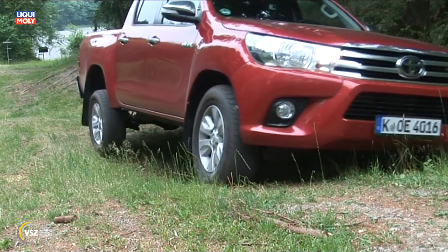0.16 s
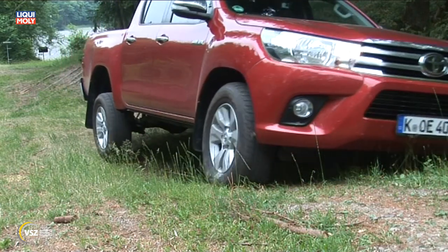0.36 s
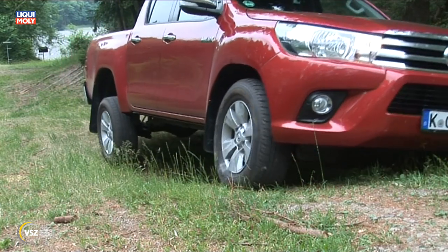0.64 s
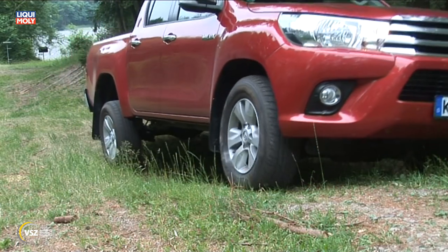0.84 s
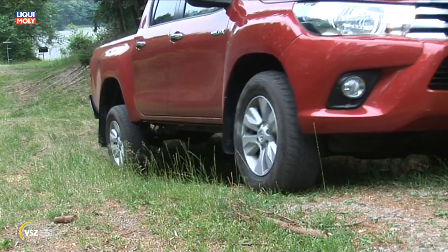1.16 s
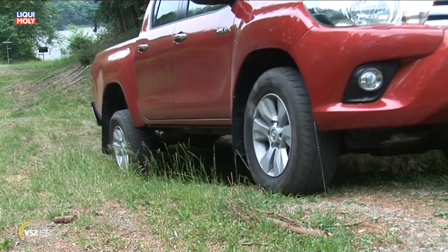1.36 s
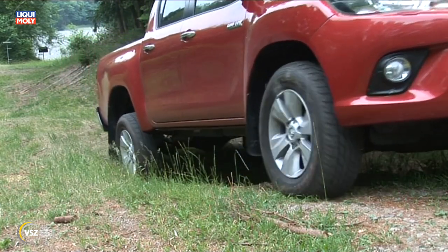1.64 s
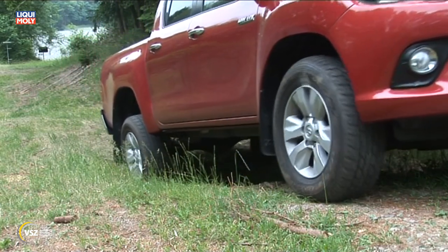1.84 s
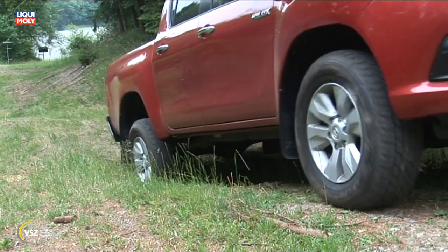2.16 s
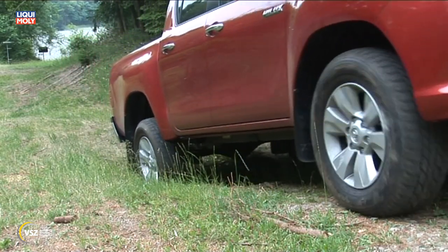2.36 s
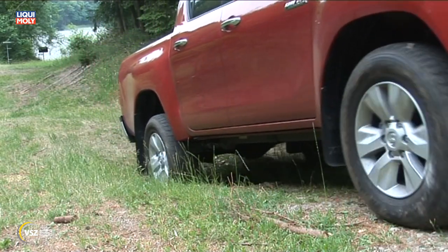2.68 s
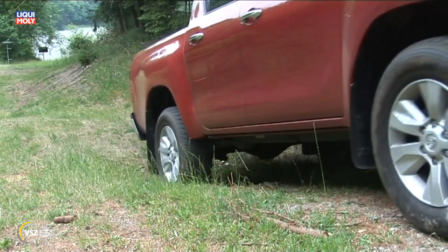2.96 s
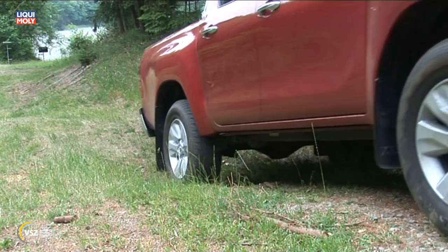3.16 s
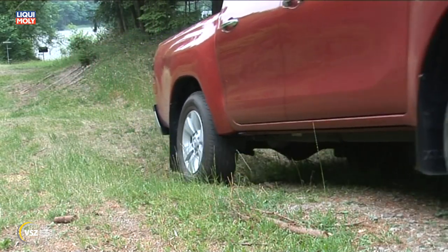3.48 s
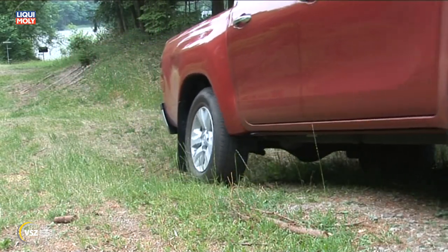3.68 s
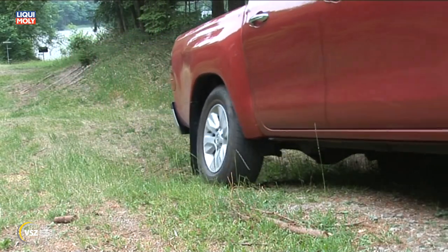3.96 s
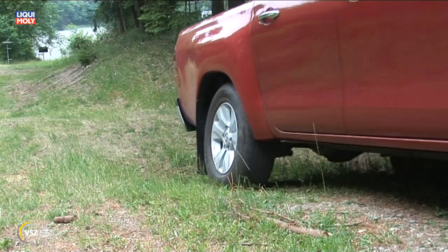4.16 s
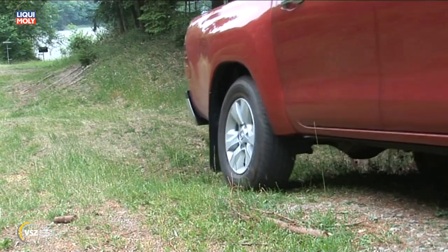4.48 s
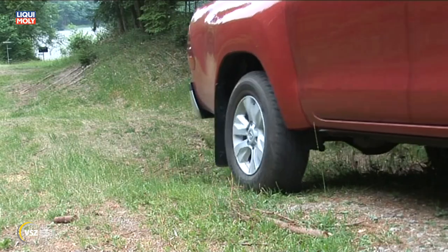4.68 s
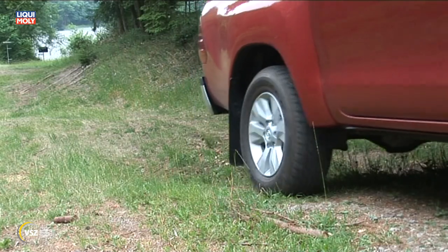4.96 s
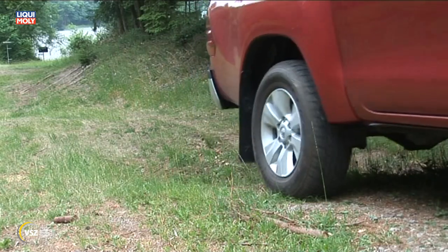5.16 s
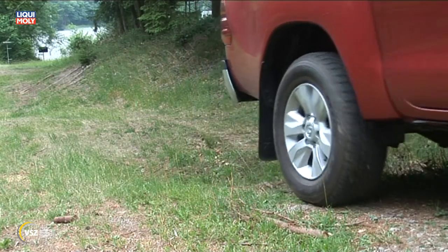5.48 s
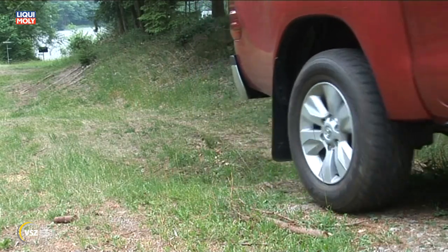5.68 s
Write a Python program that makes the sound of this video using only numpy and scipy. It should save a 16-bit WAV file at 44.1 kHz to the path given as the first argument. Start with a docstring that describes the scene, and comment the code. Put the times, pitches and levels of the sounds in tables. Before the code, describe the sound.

Outdoors, a diesel engine ticks and knocks at low, nearly steady revs as a pickup crawls toward a nearby microphone. A faint fan hum and the rumble of tyres on soft ground lie beneath, with two small dry cracks near the start. The sound swells and shifts to the right, a few harder clacks stand out, and the bright clatter gives way to hollow pulsing and hiss from under the passing body.

```python
"""A four-cylinder diesel pickup crawls over grass, just above idle, and slides close past the microphone.
Each firing pushes out a low pulse and sets off a volley of impacts: combustion knock, piston slap,
valves, injectors. Twice the engine sags under load and knocks harder; now and then one firing clacks.
As the grille goes by, the clatter gives way to boom and hiss from under the body, where the firings
ring a hollow. Behind it all the fan hums, the tyres rumble and two dry stalks snap."""
import sys
import numpy as np
from scipy import signal
from scipy.fft import rfft, irfft
from scipy.io import wavfile
from scipy.ndimage import uniform_filter1d

SR = 44100
rng = np.random.default_rng(int(sys.argv[2]) if len(sys.argv) > 2 else 0)


def dump_mix(stems):
    """Bounce the given channels to the path in sys.argv[1] as a 16-bit WAV at rate SR."""
    frames = np.atleast_2d(stems).T  # one column per channel
    limited = np.clip(frames, -1, 1)  # hard clip at full scale
    pcm = np.round(limited * 32767).astype(np.int16)
    wavfile.write(sys.argv[1], SR, pcm)


N = 257103
TIME, HZ = np.arange(N) / SR, np.fft.rfftfreq(N, 1 / SR)
CRAWL_M_PER_S = .8
HUM_SHADOW_DB = -6  # what the cab takes from the exhaust and the upper firing orders

# engine speed: (time [s], firing rate [Hz])
FIRING_RATE = [(0, 33.84), (.35, 34.64), (.62, 34.55), (.88, 32.05), (1.08, 31.95), (1.3, 34.2),
               (1.7, 33.7), (2.3, 33.69), (2.65, 33.37), (3.1, 33.67), (3.9, 33.7), (4.4, 33.58),
               (4.9, 32.67), (5.15, 33.96), (5.5, 33.77), (5.83, 34.67)]
# combustion impacts in one firing: (delay [firings], strength [dB], ring time [s])
COMBUSTION = [(-.11, 0, .006), (.1, -.5, .0055), (.3, -9, .005)]
# tone of the block and of the top end, each from ahead, then from the flank: (frequency [Hz], level [dB])
KNOCK_COLOURS = [(440, -35), (750, -8), (830, -7.5), (925, -5), (1000, -1), (1040, -2), (1140, -2.5),
                 (1250, -2.5), (1380, -8.5), (1480, -11.5), (1590, -3.5), (1900, -11.5), (2470, -77),
                 (4180, -120)], [(440, -9), (750, -0.5), (843, -5.5), (915, 0), (1010, -2.5), (1110, 1.5),
                 (1280, 0), (1550, 1), (1900, -4), (2470, -7), (4180, -120)]
CLATTER_COLOURS = [(1120, -56), (1900, -8.5), (2000, -10), (2230, -5.5), (2470, -4), (2960, -7.5),
                   (3280, -9.5), (3900, -16), (4480, -23.5), (5000, -19.5), (5350, -26), (5750, -14),
                   (6200, -31.5), (7000, -42), (9100, -50), (15400, -120)], [(1120, -53), (1900, -9),
                   (2470, -3.5), (2980, -6.5), (3520, -17), (4200, -23), (5460, -22), (9240, -120)]
# stereo image from ahead, then from the flank: (frequency [Hz], left-right likeness [0-1], left lead [rad])
IMAGES = [(60, 1.0, -0.1), (200, 0.99, -0.2), (350, 0.98, -0.3), (520, 0.93, -0.4), (800, 0.89, -0.2),
          (1200, 0.9, -0.2), (1700, 0.87, 0.3), (2400, 0.99, 0.0), (3100, 0.99, -0.0), (4400, 0.55, -1.3),
          (5000, 0.8, -0.3), (5400, 0.6, -2.4), (5800, 0.88, -3.2), (8500, 0.77, -3.3), (10500, 0.56, -5.9),
          (12500, 0.43, -6.0), (15000, 0.28, -5.7)], [(60, 1.0, -0.1), (200, 0.98, -0.3), (350, 0.96, -0.8),
          (520, 0.95, -1.4), (800, 0.83, -1.5), (1200, 0.71, -1.5), (1700, 0.62, 0.9), (2400, 0.81, -0.0),
          (3100, 0.83, -0.2), (4200, 0.63, -2.0), (5000, 0.65, -2.5), (5800, 0.79, -3.1),
          (8500, 0.59, -3.5), (10500, 0.67, -6.1), (12500, 0.52, -6.5), (15000, 0.35, -6.9)]


def gain_of(db):
    return 10 ** (np.asarray(db) / 20)


def curves(rows):
    """The columns of a time table, sample by sample."""
    times, *columns = np.transpose(rows)
    return [np.interp(TIME, times, column) for column in columns]


def spectra(rows):
    """The columns of a frequency table, bin by bin."""
    hz, *columns = np.transpose(rows)
    return [np.interp(np.log(HZ + 1), np.log(hz + 1), column) for column in columns]


def wander(per_s):
    """A smooth random drift of about unit size."""
    knots = np.arange(0, TIME[-1] + 1, 1 / per_s)
    return np.interp(TIME, knots, rng.standard_normal(1024)[:len(knots)])


def lift(hz, resonances):
    """Decibels that a set of resonances adds at these frequencies."""
    return sum(db / (1 + (2 * (hz - centre) / width) ** 2) for centre, width, db in resonances)


def passing(closest_m, distance_m):
    """Level in dB, 0 at its peak, of a source that passes distance_m away after closest_m of travel."""
    return -10 * np.log10(1 + ((closest_m - CRAWL_M_PER_S * TIME) / distance_m) ** 2)


def flank_share(after_m=2.46, over_m=.56):
    """0 with the grille ahead, 1 with the flank alongside."""
    return 1 / (1 + np.exp((after_m - CRAWL_M_PER_S * TIME) / over_m))


def shadow(after_m=4.1, over_m=.09):
    """0 with the engine in sight, 1 with the cab in between."""
    return 1 / (1 + np.exp((after_m - CRAWL_M_PER_S * TIME) / over_m))


def load(free_hz=34.6, full_droop_hz=2.6, smooth_s=.14):
    """Engine load, 0 free to 1 full, from how far the governor lets the firing rate droop."""
    droop = (free_hz - curves(FIRING_RATE)[0]) / full_droop_hz
    return np.clip(uniform_filter1d(droop, int(smooth_s * SR)), 0, 1)


def loudness(closest_m, distance_m, db, load_db):
    """Level in dB of one engine sound, set by distance and load."""
    return db + passing(closest_m, distance_m) + load_db * load()


def at_mics(pair, colour, image):
    """Colours two unrelated signals and blends them into a partly alike stereo pair at unit level."""
    # narrow resonances of block and covers: (frequency [Hz], width [Hz], lift [dB])
    resonances = [(1080, 130, 1.5), (2510, 110, 1.3), (2780, 220, 3.3), (3020, 160, 2.2), (4960, 480, 3.5)]
    left, other = rfft(pair) * gain_of(spectra(colour)[0] + lift(HZ, resonances))
    likeness, lead = spectra(image)
    right = likeness * left + np.sqrt(1 - likeness ** 2) * other
    heard = irfft(np.array([left * np.exp(.5j * lead), right * np.exp(-.5j * lead)]), N)
    return heard / heard.std()


def ring_on(pair, ring_s, ring_db):
    """Castings, covers and the cavity under the truck ring on in many narrow modes."""
    t = np.arange(SR // 6) / SR
    tail = rng.standard_normal(len(t)) * np.exp(-t / ring_s)
    tail /= np.linalg.norm(tail)
    return pair + gain_of(ring_db) * signal.oaconvolve(pair, tail[None], axes=1)[:, :N]


def puffs(firings, cylinders, hz, rise_s, scatter_db, detune):
    """Each firing briefly rings a cavity near the curve hz; complex, so that its phase can be turned."""
    t, out = np.arange(SR // 16) / SR, np.zeros(N + SR, complex)
    swell = (t / rise_s * np.exp(-t / rise_s)) ** 2
    for firing, (luck, stray) in zip(range(int(firings[-1]) + 1), rng.standard_normal((256, 2))):
        delay, db = cylinders[firing % len(cylinders)]
        at = int(np.interp(firing + delay, firings, TIME) * SR)
        tone = np.exp(2j * np.pi * hz[at] * (1 + detune * stray) * t)
        out[at:at + len(t)] += gain_of(db + scatter_db * luck) * swell * tone
    return out[:N] / out[:N].real.std()


def volley(firings, force, impacts, cylinder_db, repeat, scatter_db, bed_db, jitter_s=.0004):
    """Metal rings after each impact: partly alike whenever that cylinder fires, partly new, over a bed."""
    firing = np.arange(1, int(firings[-1]) + 1)
    t = np.arange(SR // 30) / SR
    ringing, power = np.zeros((2, N)), np.zeros(N)
    for delay, db, ring_s in impacts:
        slip, luck = rng.standard_normal((2, 256))[:, :len(firing)]
        # a hard firing hardens all its impacts
        size_db = db + scatter_db * (force[:len(firing)] + luck) / np.sqrt(2)
        strike_s = np.interp(firing + delay, firings, TIME) + jitter_s * slip
        at = np.clip(strike_s * SR, 0, N - 1).astype(int)
        fade = np.exp(-t / ring_s) * (1 - np.exp(-t / .0023))
        for cylinder, strength_db in enumerate(cylinder_db):
            blows, own = np.zeros(N), firing % len(cylinder_db) == cylinder
            blows[at[own]] = gain_of(size_db[own] + strength_db)
            signature = fade * rng.standard_normal((2, len(t)))
            ringing += signal.oaconvolve(blows[None], signature, axes=1)[:, :N]
            power += signal.oaconvolve(blows ** 2, fade ** 2)[:N]
    noise_level = np.sqrt(abs((1 - repeat) * power + gain_of(bed_db) ** 2 * power.mean()))
    return np.sqrt(repeat) * ringing + noise_level * rng.standard_normal((2, N))


def rumble(level_db=-44.5, stray_db=-11):
    """Tyres on soft ground and shaking body panels; a little low end reaches each side on its own."""
    # tone of the rumble: (frequency [Hz], level [dB])
    colour = [(8, -20), (20, -20), (40, 0.5), (80, 0), (130, -7), (175, -0.5), (240, -8), (310, -6.5),
              (360, -15), (430, -33.5)]
    common = at_mics(rng.standard_normal((2, N)), colour, IMAGES[1])
    stray = irfft(rfft(rng.standard_normal((2, N))) * gain_of(spectra(colour)[0]) / (1 + HZ / 60), N)
    stray /= np.sqrt(np.mean(stray ** 2))
    level = gain_of(level_db + passing(closest_m=5.4, distance_m=2.62) + .75 * wander(8))
    return level * (common + gain_of(stray_db) * stray)


def stalks(decay_s=.0013, band_hz=(6800, 13500)):
    """Dry stalks snap under a tyre with tiny bright cracks."""
    # the cracks: (time [s], strength [dB])
    snaps = [(.642, -38), (.6645, -44)]
    burst = sum(gain_of(db) * np.exp(-abs(TIME - s) / decay_s) * (TIME >= s) for s, db in snaps)
    band = signal.butter(2, band_hz, "bandpass", fs=SR, output="sos")
    return signal.sosfilt(band, burst * rng.standard_normal((2, N)))


def fan(stir_rad=.35, ahead_db=-46.3):
    """The cooling fan's blade tone, heard through the grille; uneven air stirs it."""
    # the fan slips on its clutch: (time [s], blade rate [Hz])
    blade_rate = [(0, 90), (.6, 90), (1.2, 87.3), (2.6, 87.5), (3.6, 90)]
    angle = 2 * np.pi * np.cumsum(curves(blade_rate)[0]) / SR + stir_rad * wander(7)
    return np.sqrt(2) * gain_of(ahead_db) * (1 - flank_share()) * np.sin(angle)


def exhaust(firings, silencer_hz=152, level_db=-50):
    """Each firing rings the silencer; two strong and two weak puffs make the engine lope."""
    # each cylinder's puff: (delay [firings], strength [dB])
    cylinders = [(.09, 0), (.05, 1), (.28, -4), (.07, -4)]
    ring = puffs(firings, cylinders, np.full(N, silencer_hz), rise_s=.0058, scatter_db=1, detune=.03)
    db = level_db + passing(closest_m=3, distance_m=2.3) + HUM_SHADOW_DB * shadow()
    return gain_of(db) * ring.imag


def hollow(firings, pan_db=-6, lead_rad=-1.3):
    """Each firing rings the hollow under the body, every second one harder; the right side leads."""
    # the hollow rings louder and lower as it comes alongside: (time [s], pitch [Hz], level [dB])
    cavity = [(0, 570, -72), (2.7, 570, -57), (3.2, 555, -49.5), (3.7, 540, -46.5), (4.4, 515, -45),
              (4.95, 500, -42.5), (5.25, 495, -43.5), (5.6, 485, -50), (5.83, 485, -49)]
    # each cylinder's blow: (delay [firings], strength [dB])
    blows = [(-.15, -2), (-.13, 0), (.02, -2), (-.08, .3)]
    hz, db = curves(cavity)
    ring = puffs(firings, blows, hz, rise_s=.0055, scatter_db=.7, detune=.04)
    side = np.array([[.5], [-.5]])
    return gain_of(db + pan_db * side) * (ring * np.exp(1j * lead_rad * side)).real


def throb(firings, lean_rad=1.15, waver_db=.5, drone_s=5.08, drone_rise_s=.096, drone_db=-43.5):
    """The firing orders add up to a lopsided low pulse; the weaker ones waver and stir the body panels."""
    # orders 1-3: (travel until closest [m], distance then [m], level then [dB], change at full load [dB])
    low_orders = [(3.86, 1.8, -30.5, -5.5), (4.13, 1.54, -40.5, -0.1), (2.2, 1, -46.5, -2)]
    # weaker orders: (multiple of the firing rate, level [dB])
    overtones = [(4, -58.5), (5, -65.5), (6, -65), (7, -60.5), (9, -65), (11, -63.5)]
    # panels that groan when the sagging orders reach them: (frequency [Hz], width [Hz], lift [dB])
    panels = [(160, 8, 16), (352, 8, 10)]
    firing_hz, angle = curves(FIRING_RATE)[0], 2 * np.pi * (firings - .07)
    low = sum(gain_of(loudness(*row)) * np.cos(order * angle + lean_rad * (order > 1))
              for order, row in enumerate(low_orders, 1))
    # a drone on the third order sets in as the load comes off
    onset = np.clip((TIME - drone_s) / drone_rise_s, 0, 1)
    drone = gain_of(drone_db) * onset * np.cos(3 * angle - lean_rad / 2)
    high = 0
    for order, db in overtones:
        level_db = db + lift(order * firing_hz, panels) + waver_db * wander(6.3)
        phase = 2 * np.pi * order * (firings - .42) + wander(4.7)
        high += gain_of(level_db + HUM_SHADOW_DB * shadow()) * np.cos(phase)
    return -np.sqrt(2) * (low + drone + high)


def clacks(ring_s=.0045, rise_s=.0015, pan_db=-4):
    """A hard firing rings block and covers together."""
    # the hard firings: (time [s], strength [dB])
    hits = [(2.759, -34), (4.155, -33), (4.275, -31), (4.634, -32), (4.696, -29), (5.649, -33)]
    ages = [(np.maximum(TIME - s, 0), db) for s, db in hits]
    burst = sum(gain_of(db) * np.exp(-age / ring_s) * (1 - np.exp(-age / rise_s)) for age, db in ages)
    metal = sum(at_mics(rng.standard_normal((2, N)), colours[1], IMAGES[1])
                for colours in (KNOCK_COLOURS, CLATTER_COLOURS))
    return burst * metal * gain_of([[pan_db / 2], [-pan_db / 2]])


def injector_hiss(firings, wash_db, flutter_db=.6):
    """The injectors tick, all four equally hard, and blur into a fluttering hiss."""
    # ticks in one firing: (delay [firings], strength [dB], ring time [s])
    ticks = [(-.17, 0, .0055), (.03, -.5, .0055), (.24, -1, .005)]
    force = rng.standard_normal(256)
    hiss = volley(firings, force, ticks, [0, 0, 0, 0], repeat=.19, scatter_db=2.4, bed_db=-2.3 + wash_db)
    return hiss * gain_of(flutter_db * wander(19))


def valve_clatter(firings, force, wash_db, shadow_db=-3.6):
    """Valves strike and ring the covers, quieter once the cab is in the way."""
    # strikes in one firing: (delay [firings], strength [dB], ring time [s])
    valves = [(0, -3, .01), (.17, 3.5, .0044), (.418, -8, .02), (.86, -2, .008)]
    # each cylinder's clatter: (strength [dB])
    cylinders = [2, -.3, .5, -2]
    # the clatter swells and sinks: (time [s], level [dB])
    swell = [(0, -.5), (.5, -1), (.95, 1.4), (1.7, 1.4), (2.25, 0), (2.78, 1.7), (3.45, -.3), (4.3, .3),
             (4.6, -.5), (4.95, 1), (5.25, -1.8), (5.83, -1)]
    strikes = volley(firings, force, valves, cylinders, repeat=.22, scatter_db=1, bed_db=-3.1 + wash_db)
    level = gain_of(curves(swell)[0] + shadow_db * shadow())
    return ring_on(strikes, ring_s=.0056, ring_db=-7.5) * level


def underbody_boom(firings, force):
    """Combustion booms in the cavity under the truck."""
    # each cylinder's boom: (strength [dB])
    cylinders = [-0.28, -0.15, 0.8, 0.63]
    blows = volley(firings, force, COMBUSTION, cylinders, repeat=.55, scatter_db=.5, bed_db=-1.5)
    return ring_on(blows, ring_s=.047, ring_db=-14.5)


def block_knock(firings, force, wash_db):
    """Combustion and piston slap ring the block."""
    # each cylinder's knock: (strength [dB])
    cylinders = [-1.2, -2.4, -3, -5.5]
    blows = volley(firings, force, COMBUSTION, cylinders, repeat=.3, scatter_db=.5, bed_db=-2.6 + wash_db)
    return ring_on(blows, ring_s=.015, ring_db=-9)


def engine(firings):
    """Boom, knock, clatter and hiss, each changing level, colour and pan as the truck goes by."""
    # tone of boom and hiss, each from ahead, then from the flank: (frequency [Hz], level [dB])
    boom_colours = [(160, -62), (280, -13), (350, 0.5), (394, -12.5), (435, -3), (533, -5.5), (600, -7),
                    (705, -6), (750, -13.5), (980, -48), (1650, -120)], [(160, -41), (280, -50), (333, -2),
                    (362, -3.5), (394, -2), (482, -2.5), (545, -4.5), (630, 4), (714, -18), (750, -16.5),
                    (980, -10), (1650, -120)]
    hiss_colours = [(4120, -43), (7000, -18), (9210, -22), (10700, -0.5), (12000, -8.5), (13400, -0.5),
                    (14500, -10), (15600, -2.5)], [(2350, 0), (4000, 8.5), (4530, 1), (4940, 9), (5200, -4),
                    (5380, 1), (5850, 9.5), (6750, -7.5), (7560, -24), (9020, -15.5), (11100, 2.5),
                    (12600, 1.5), (14100, 7.5), (15600, -3)]
    # how boom, knock, clatter and hiss pass:
    # (travel until closest [m], distance then [m], level then [dB], change at full load [dB])
    paths = [(3.79, 1.12, -45, 4), (3.92, 1.03, -40.5, 2.5), (3.62, 2.07, -41.5, 0),
             (4.29, 0.72, -46.5, 1.3)]
    # their pans, all right of centre: (left minus right at first [dB], at last [dB], bend [exponent])
    pans = [(-3, -2.5, 1), (-1, -17.5, 1.07), (-1.5, -7.5, 12), (-5, -6.5, 0.76)]
    flank, force = flank_share(), rng.standard_normal(256)
    wash_db = 4.5 * (1 - flank * load())  # alongside and under load, impacts stand further out of the bed
    drives = [underbody_boom(firings, force), block_knock(firings, force, wash_db),
              valve_clatter(firings, force, wash_db), injector_hiss(firings, wash_db)]
    colours = boom_colours, KNOCK_COLOURS, CLATTER_COLOURS, hiss_colours
    # treble is the most directional, so it takes on the flank's colour last
    shares = [flank ** power for power in (.9, 1.05, 1.3, 2.8)]
    out = np.zeros((2, N))
    for drive, (ahead, side), share, path, pan in zip(drives, colours, shares, paths, pans):
        first_db, last_db, bend = pan
        pan_db = first_db + (last_db - first_db) * (TIME / TIME[-1]) ** bend
        sides = gain_of([pan_db / 2, -pan_db / 2])
        sound = (1 - share) * at_mics(drive, ahead, IMAGES[0]) + share * at_mics(drive, side, IMAGES[1])
        out += gain_of(loudness(*path)) * sound * sides / sides.mean(0)
    return out


def scene():
    firings = .18 + np.cumsum(curves(FIRING_RATE)[0]) / SR  # running count: the engine's clock
    truck = throb(firings) + exhaust(firings) + fan() + engine(firings) + hollow(firings) + clacks()
    return truck + rumble() + stalks()


def record(dry, edge_hz=15830):
    """A steep low-pass trims the highest treble."""
    lowpass = signal.firwin(1023, edge_hz, window=("kaiser", 9), fs=SR)
    return signal.oaconvolve(dry, lowpass[None], "same")


dry = scene()
out = record(dry)
dump_mix(out)
```